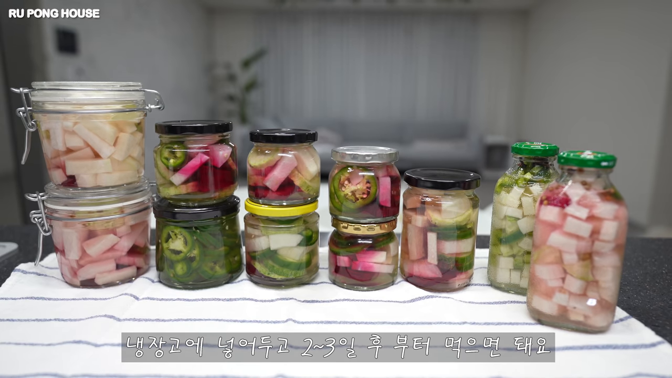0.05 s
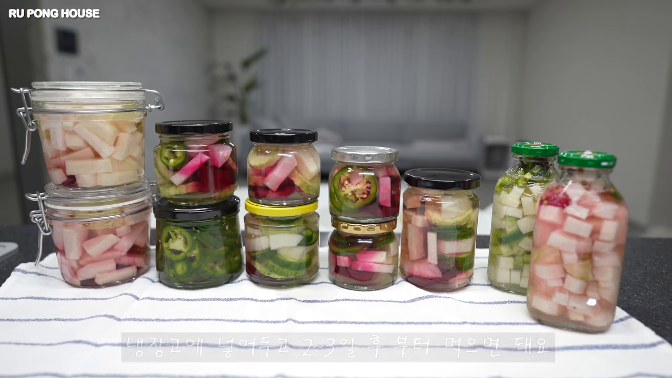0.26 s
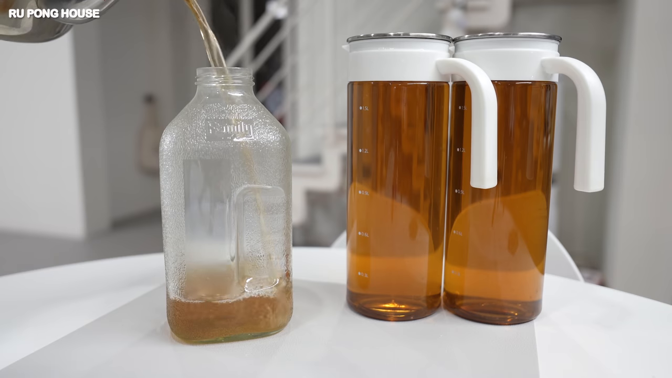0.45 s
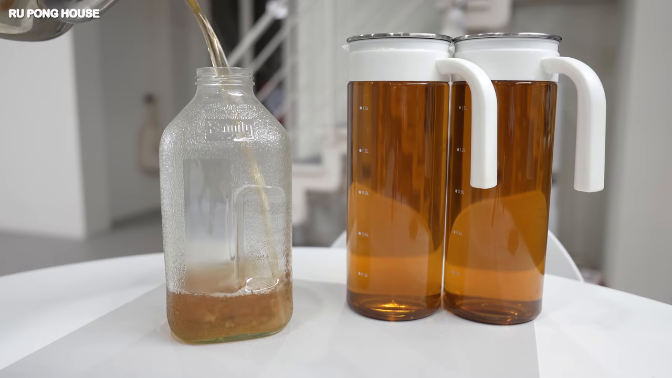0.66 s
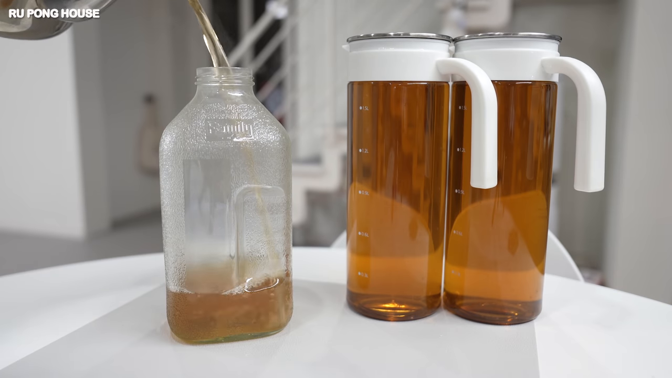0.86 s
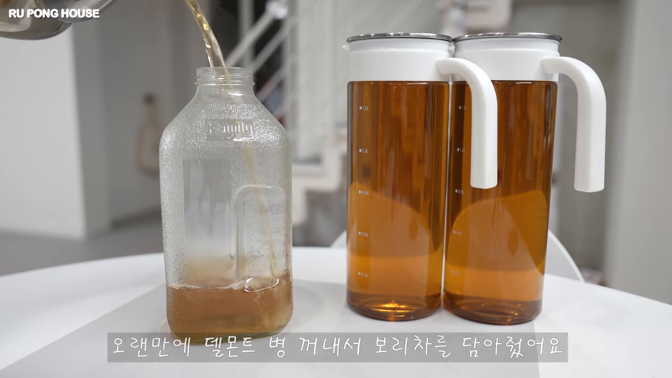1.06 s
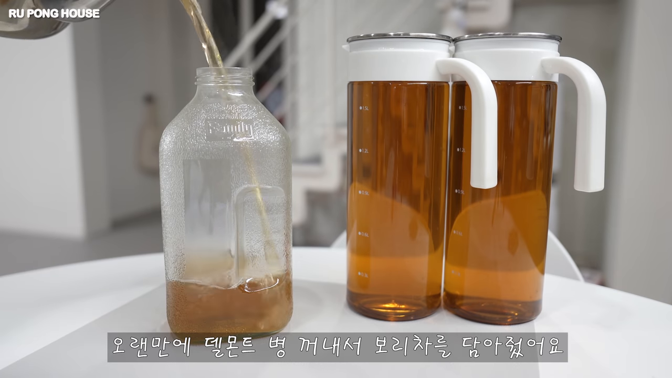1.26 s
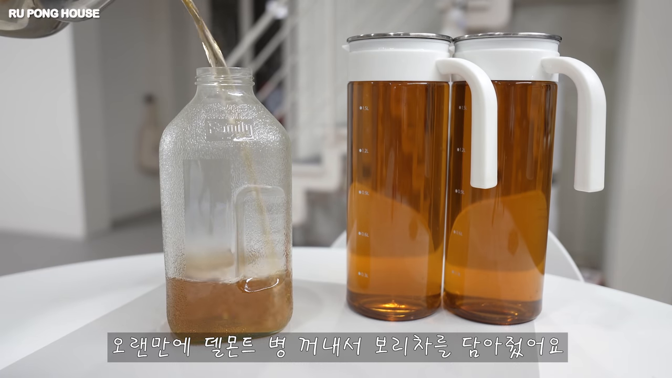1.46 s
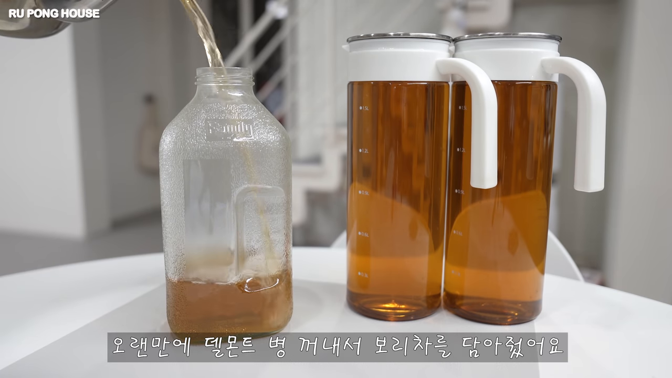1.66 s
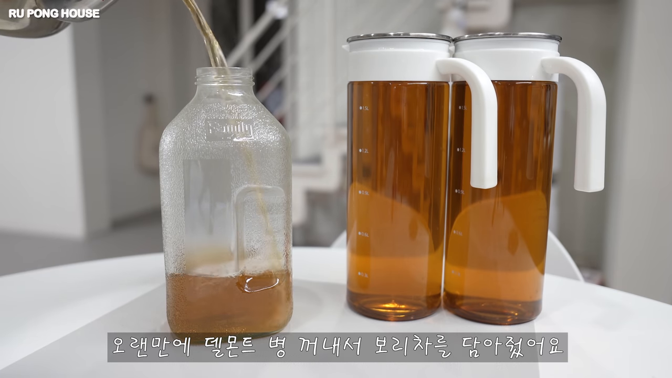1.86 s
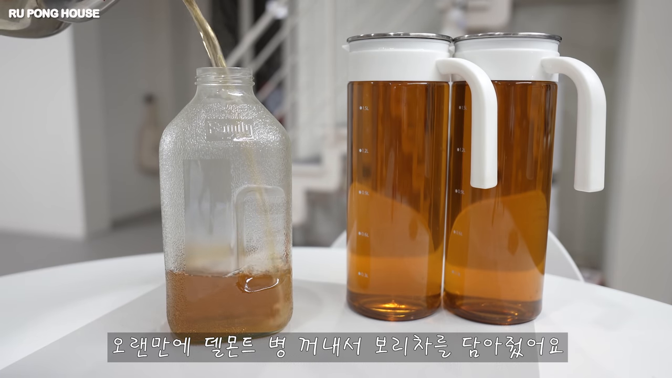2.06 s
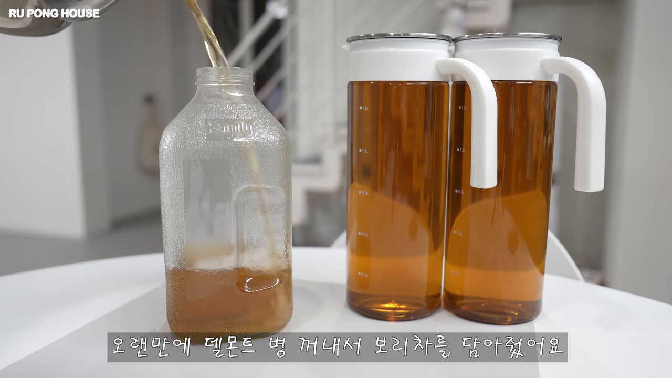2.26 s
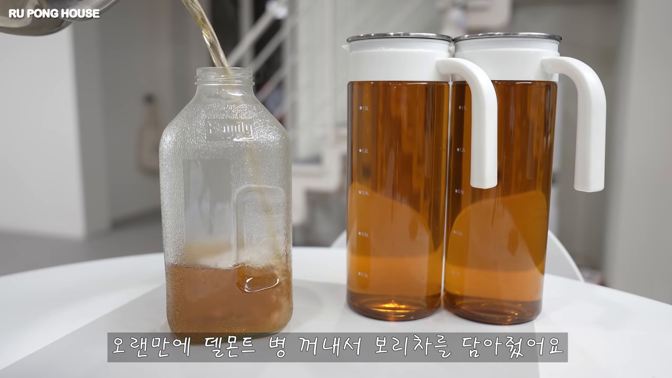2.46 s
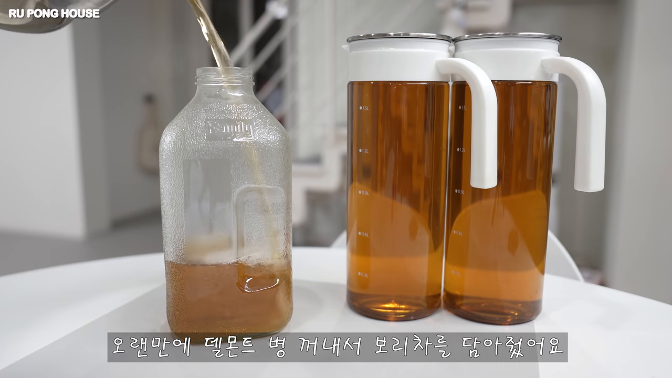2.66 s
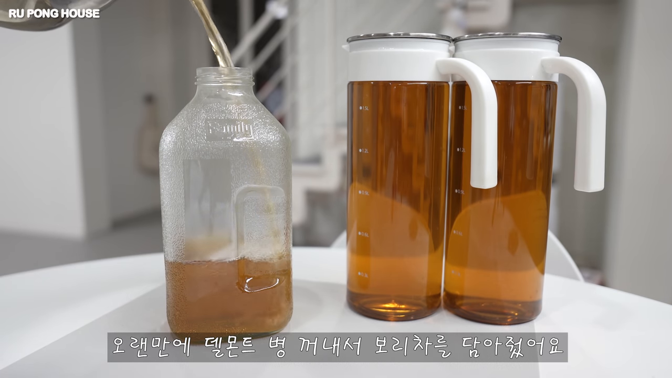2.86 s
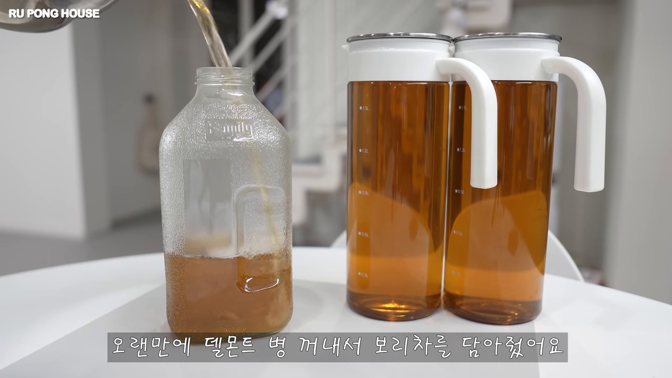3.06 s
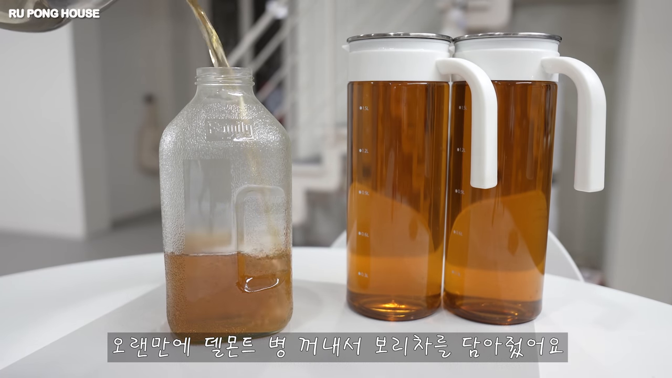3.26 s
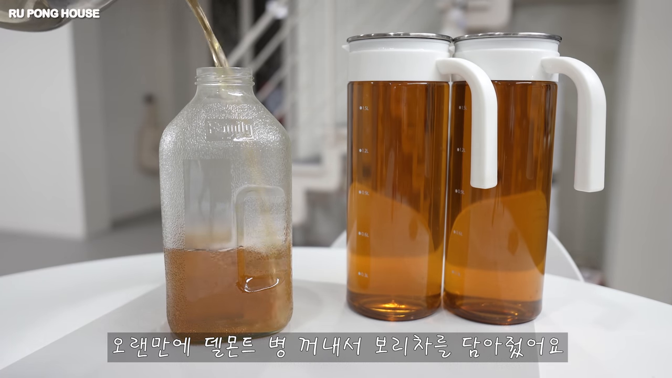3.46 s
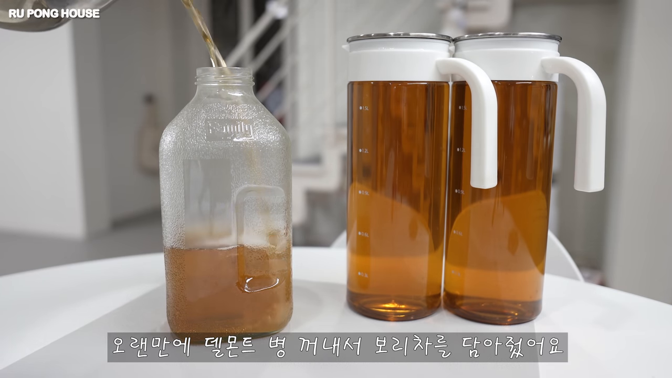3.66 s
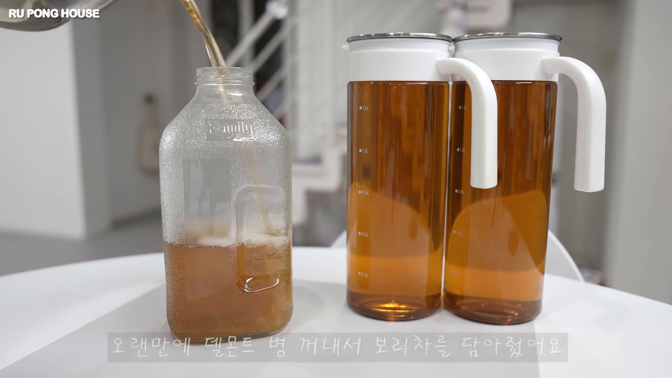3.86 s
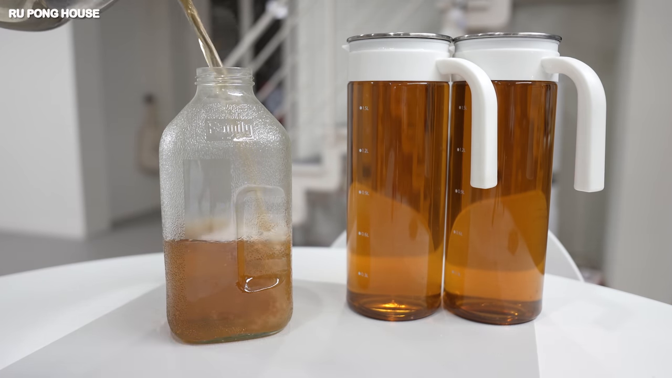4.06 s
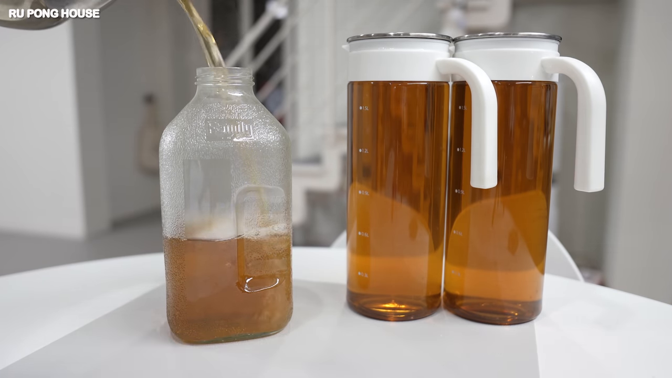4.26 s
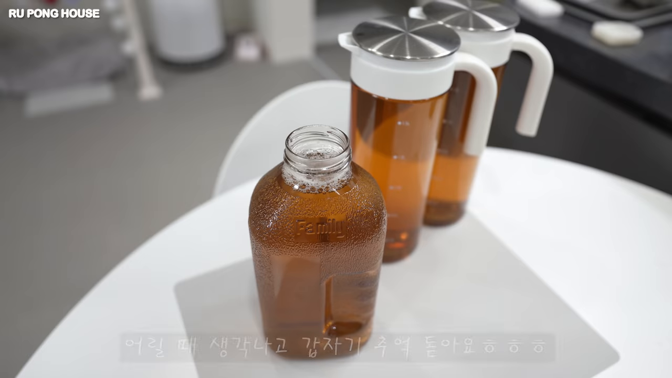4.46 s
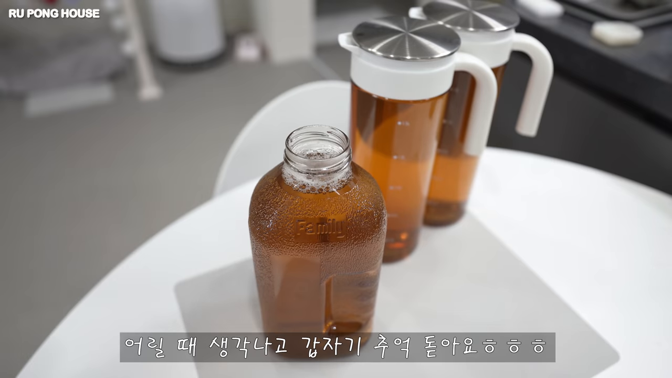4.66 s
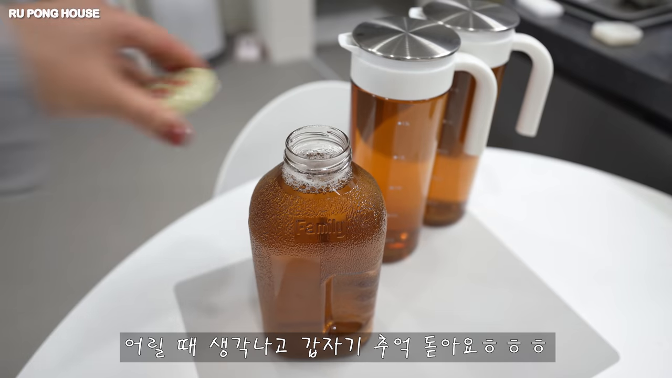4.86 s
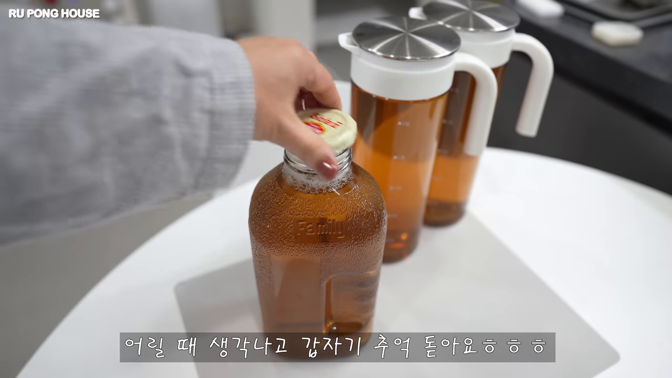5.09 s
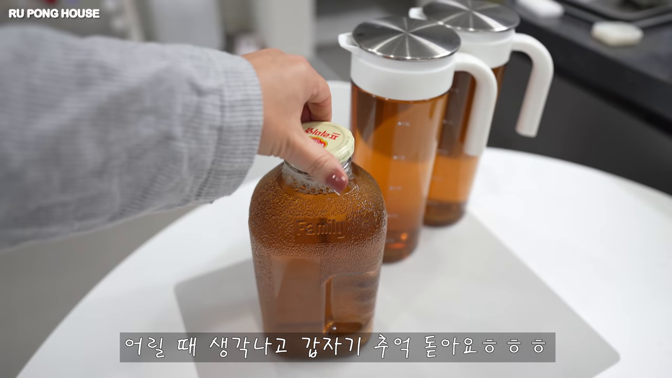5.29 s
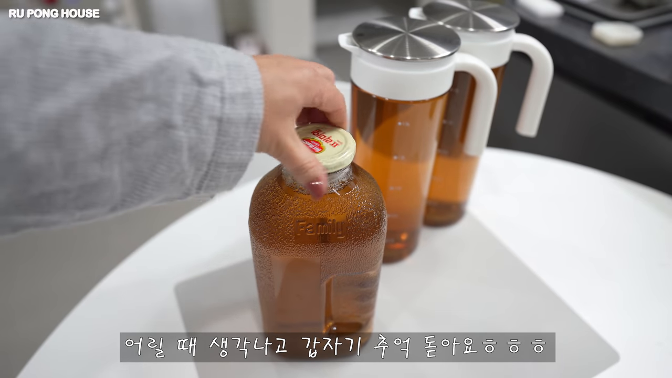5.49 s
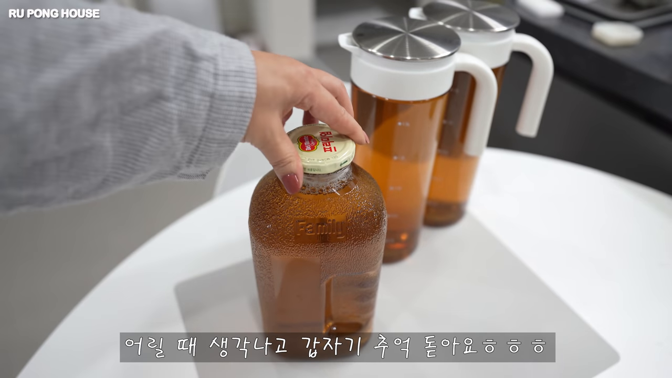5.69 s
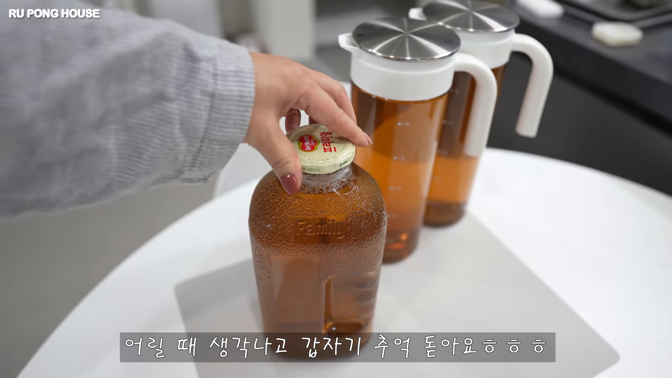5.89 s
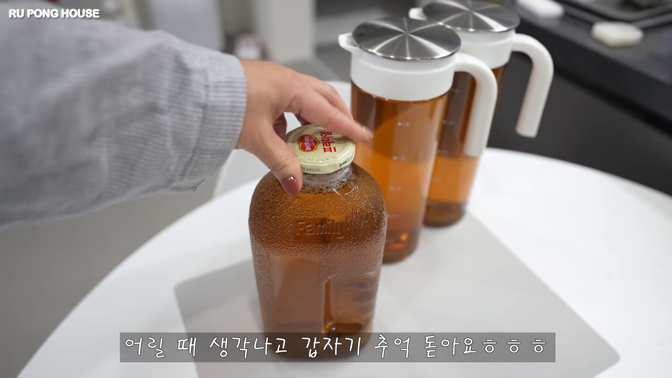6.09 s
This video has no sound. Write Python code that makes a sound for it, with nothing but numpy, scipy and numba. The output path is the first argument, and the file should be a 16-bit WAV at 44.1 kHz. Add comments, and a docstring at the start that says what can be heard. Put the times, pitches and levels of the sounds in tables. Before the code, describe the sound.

In a quiet kitchen with a faint low rumble, a stream of tea suddenly starts pouring into a glass bottle. Bright splashes and fizzing bubbles mix with hollow gurgles whose ringing notes climb as the bottle fills. The pouring thins and ends, then a metal cap knocks sharply on the glass rim, rattles briefly and settles. Close microphone, short room echoes.

```python
"""Behind everything lie a quiet, steady kitchen noise and a slowly changing rumble. Soon hot tea is poured into a glass
bottle on a table: splashes, bubbles and plunging air pockets ring the shrinking air space, whose notes mostly rise.
Then a metal cap clatters onto the rim, with a few faint touches at the end. Random drops and timed hits
set off ringing notes and noise bursts; short echoes stand for the kitchen's walls."""
import sys
import numpy as np
from scipy import signal
from scipy.fft import rfft, irfft, next_fast_len
from scipy.io import wavfile
from numba import njit

SR = 44100
rng = np.random.default_rng(int(sys.argv[2]) if len(sys.argv) > 2 else 0)


def generate_wav(signal):
    """Clip the signal to [-1, 1] and save it as 16-bit WAV at the path in sys.argv[1]."""
    frames = np.transpose(np.atleast_2d(signal))
    scaled = np.clip(frames, -1, 1) * 32767
    pcm = np.round(scaled).astype(np.int16)
    wavfile.write(sys.argv[1], SR, pcm)


N = 270465   # length in samples

# Sharp splashes. Each row: start in seconds, then relative levels and a pitch: bright part in dB,
# part inside the bottle in dB, droplet pitch in Hz, droplet level in dB.
SPLASHES = [(0.3938, -28, -51, 6500, -34.5), (0.4493, -31, -53, 3080, -50), (0.5907, -29, -50, 6300, -51),
            (0.635, -33, -54, 2790, -41), (0.6585, -19, -40.5, 10360, -32),
            (0.757, -24.5, -51, 2960, -37.5), (0.8122, -32, -43, 6840, -38),
            (0.9004, -28, -44, 6640, -35.5), (0.955, -39, -48, 2660, -53), (0.971, -15, -40.5, 7250, -26.5),
            (1.0524, -37, -37.5, 2610, -50), (1.17, -46, -57, 5100, -40), (1.1835, -23, -42.5, 6940, -29),
            (1.2629, -24, -42, 6700, -42), (1.2873, -33, -39.5, 4060, -34), (1.3194, -31, -49, 4580, -38),
            (1.4606, -31, -48, 2540, -44), (1.4798, -26.5, -53, 2570, -43), (1.5742, -33, -50, 2400, -43),
            (1.593, -32, -52, 2720, -54), (1.642, -24.5, -47.5, 2540, -40), (1.6776, -31, -53, 2560, -55),
            (1.705, -31, -48, 2610, -40), (1.7687, -33, -60, 9500, -37), (1.7954, -28.5, -49, 2500, -42),
            (1.8619, -19.5, -44, 9200, -33), (1.9065, -32, -44.5, 6700, -39),
            (1.9537, -25.5, -38, 2780, -49), (1.9738, -34, -46, 2590, -50), (2.079, -26, -44.5, 5270, -36),
            (2.1367, -34.5, -52, 2600, -42), (2.189, -26.5, -40, 2600, -43),
            (2.2208, -28, -47.5, 6080, -34.5), (2.338, -31, -49, 2630, -53), (2.3558, -32, -47, 2630, -45),
            (2.3872, -29.5, -56, 2480, -49), (2.4127, -22, -38, 2650, -42), (2.5039, -34, -42, 2540, -38),
            (2.5674, -30, -45.5, 2500, -48), (2.6637, -35.5, -41, 4520, -42), (2.809, -40, -52, 2590, -53),
            (3.0177, -37, -47, 2580, -45), (3.054, -33.5, -56, 2675, -43), (3.188, -46, -54, 8000, -39),
            (3.1996, -40, -45, 3800, -44), (3.2532, -43, -45.5, 2740, -42), (3.2803, -30.5, -54, 4940, -47),
            (3.3326, -32, -52, 2720, -48), (3.392, -30, -42, 4250, -54), (3.4223, -35, -56, 5500, -44),
            (3.5641, -21.5, -35.5, 2644, -34), (3.631, -30.5, -47, 4400, -46),
            (3.6664, -25, -41, 4240, -53), (3.767, -35, -52, 4000, -45.5), (3.7929, -30, -44, 2830, -48),
            (4.0191, -33, -45.5, 4100, -54), (4.506, -45, -49, 2850, -52), (4.522, -36, -56, 6480, -43),
            (4.5526, -34.5, -49.5, 8030, -47), (4.6138, -32.5, -47, 4050, -42),
            (4.7744, -44, -70, 8380, -56), (4.9017, -41, -66, 13600, -34)]


def amp(db):
    """Decibels to gain."""
    return 10 ** (np.asarray(db) / 20)


def rms_one(x):
    """Scale a sound to an average (rms) strength of 1."""
    return x / np.sqrt(np.mean(x ** 2) + 1e-20)


def in_time(rows):
    """Turn table columns into smooth curves, one value a sample; the first column is time in seconds."""
    s, *columns = np.transpose(rows)
    return [np.interp(np.arange(N) / SR, s, c) for c in columns]


def clicks(times, levels_db):
    """One impulse for each event."""
    out = np.full(N, 1e-18)   # a tiny floor instead of exact zeros
    np.add.at(out, np.round(np.asarray(times) * SR).astype(int), amp(levels_db))
    return out


def grains(per_s, spread_db):
    """Random impulses of very uneven size and either sign; rms 1."""
    excess_db = spread_db * np.minimum(rng.exponential(1, N), 5)
    sizes = amp(excess_db) * rng.choice([-1, 1], N)
    happens = rng.random(N) < per_s / SR
    return rms_one(sizes * happens) + 1e-18


def soft(x, hz):
    """A yielding contact: a second-order low-pass smears the impulses."""
    return signal.sosfilt(signal.butter(2, hz, fs=SR, output="sos"), x)


def band(x, low_hz, high_hz):
    """Keep only the sound between two pitches."""
    return signal.sosfilt(signal.butter(2, [low_hz, high_hz], "band", fs=SR, output="sos"), x)


def dying_noise(times, levels_db, t60):
    """Bursts of noise that fade by 60 dB in t60 seconds."""
    fade = signal.lfilter([1], [1, -amp(-60 / (t60 * SR))], clicks(times, levels_db))
    return fade * rng.standard_normal(N)


@njit
def glide(x, w, r):
    """A unit click sets a sine of height 1 ringing at the moving pitch w; r is the share kept each sample."""
    out, state = np.zeros(len(x)), 0j
    for i in range(len(x)):
        state = state * r[i] * np.exp(1j * w[i]) + x[i]
        out[i] = state.imag
    return out


def ring(x, hz, t60):
    """A note of fixed or moving pitch, set ringing by x."""
    step = 2 * np.pi * hz / SR * np.ones(N)
    kept = amp(-60 / (t60 * SR)) * np.ones(N)
    return glide(x, step, kept)


def resonances(x, table):
    """Side-by-side resonances of (Hz, width in Hz, dB); x is one drive for all or one for each."""
    out = 0
    drives = np.broadcast_to(x, (len(table), N))
    for k, ((hz, width_hz, db), drive) in enumerate(zip(table, drives)):
        r = np.exp(-np.pi * width_hz / SR)
        poles = [1, -2 * r * np.cos(2 * np.pi * hz / SR), r * r]
        top = signal.lfilter([1, 0, -1], poles, drive) * (1 - r * r) / 2
        out = out + (-1) ** k * amp(db) * top   # alternate signs
    return out


def bursts(times, levels_db, hz, t60, bend):
    """Separate dying notes; over its life each changes pitch by twice bend, as a share of its pitch."""
    out = np.zeros(N + SR)
    for s, db, f, life in np.broadcast(times, levels_db, hz, t60):
        i, t = round(s * SR), np.arange(round(life * SR)) / SR
        swell = np.minimum(t * f / 1.51, 1)   # the swing builds up over about one and a half cycles
        swing = np.sin(2 * np.pi * f * t * (1 + bend * t / life))
        out[i:i + len(t)] += swell * amp(db - 60 * t / life) * swing
    return out[:N]


def hush():
    """Background: steady noise shaped by a colour curve, and a slowly changing low rumble."""
    # Colour of the steady noise. Each row: pitch in Hz, relative level in dB.
    colour = [(12, -58.5), (20, -29.5), (65, -10.5), (86, -14.5), (244, -20.5), (281, -31), (323, -22.5),
              (1020, -35), (3720, -53.5), (6910, -46), (8410, -53), (14300, -45.5), (16500, -59.5)]
    # Low rumble through the table. Each row: time in seconds, level in dB.
    rumble = [(0.0, -71), (0.05, -59.5), (0.8, -59), (0.99, -50.5), (3.26, -56), (3.46, -68), (3.52, -46),
              (3.89, -56), (4.03, -54), (4.46, -71), (4.63, -58), (5.12, -64), (5.72, -48.5), (6.13, -59.5)]
    hz = np.maximum(np.arange(N // 2 + 1) * SR / N, 1)
    at, db = np.transpose(colour)
    shape = amp(np.interp(np.log(hz), np.log(at), db))
    steady = rms_one(irfft(rfft(rng.standard_normal(N)) * shape, N))
    low = rms_one(band(rng.standard_normal(N), 45, 80))
    return amp(-63.5) * steady + amp(in_time(rumble)[0]) * low


def drops(count, shared, own, hiss):
    """Drives for several resonances: drops heard in all, drops of its own for each, and hiss."""
    common, private = grains(per_s=140, spread_db=8.0), grains(per_s=110, spread_db=4.5)
    shifts = rng.integers(N, size=count)
    landing = shared * common + own * np.array([np.roll(private, s) for s in shifts])
    # a drop spatters briefly
    smear = rms_one(signal.lfilter([1], [1, -amp(-60 / (0.021 * SR))], np.abs(landing)))
    return (smear + hiss) * rng.standard_normal(N)


def bubbles(count, low_hz, high_hz, cycles):
    """Small bubbles born at random, pitch rising as they near the surface; rms 1."""
    when, size, strength = rng.random((count, 3)).T
    hz = low_hz * (high_hz / low_hz) ** size
    level_db = -5.0 * np.log(strength + 1 / 100)
    return rms_one(bursts(.39 + 4.6 * when, level_db, hz, cycles / hz, bend=0.326))


def inside_bottle(slosh_db, wall_hz, overtones_hz, heave):
    """Sloshing tea excites fixed resonances, the glass wall and the air's overtones; small bubbles fizz."""
    # Steady resonances in the bottle. Each row: pitch in Hz, width in Hz, relative level in dB.
    bottle_modes = [(533, 36, -2), (2697, 140, 5), (3030, 160, -0.5), (4054, 336, 0), (5170, 580, -3.5)]
    # Overtones of the air column. Each row: relative level in dB, ring time (60 dB fade) in seconds.
    overtones = [(-26, 0.018), (-37.5, 0.025), (-35.5, .015)]
    s, _, inside_db, _, _ = np.transpose(SPLASHES)
    slosh = amp(slosh_db) * drops(len(bottle_modes), shared=0.86, own=0.84, hiss=0.54)
    slosh = slosh + dying_noise(s, inside_db + 7.0, t60=0.044)
    out = amp(5.0) * resonances(slosh, bottle_modes)
    out = out + amp(-35.5) * ring(slosh[0], wall_hz, t60=0.059)
    for (db, t60), hz, drive in zip(overtones, overtones_hz, slosh[1:]):
        out = out + amp(db) * ring(drive, heave * hz, t60)
    return out + amp(slosh_db - 18) * bubbles(count=1200, low_hz=381, high_hz=1690, cycles=38.0)


def spray_at_mouth(spray_db):
    """Spray and sharp splashes are noise coloured by high resonances; tiny bubbles fizz along."""
    # Colour of the spray. Each row: pitch in Hz, width in Hz, relative level in dB.
    mouth = [(6560, 416, -3), (8050, 320, -3), (9210, 730, -6.5), (11500, 1100, -4), (12000, 1300, -4.5),
             (15200, 2300, -10)]
    s, bright_db, _, _, _ = np.transpose(SPLASHES)
    spray = amp(spray_db + 1.5) * drops(len(mouth), shared=0.92, own=0.69, hiss=0.41)
    spray = spray + dying_noise(s, bright_db - 2.5, t60=0.027)
    fizz = amp(spray_db - 3.8) * bubbles(count=2200, low_hz=3760, high_hz=14500, cycles=65.0)
    return amp(3.5) * resonances(spray, mouth) + fizz


def droplets():
    """Each sharp splash adds a short note that rises in pitch; high ones die sooner."""
    s, _, _, hz, db = np.transpose(SPLASHES)
    return bursts(s, db, hz, 175.0 / hz, bend=0.075)


def gurgles():
    """Large bubbles give low notes that rise as they die."""
    # Each row: start in seconds, level in dB, starting pitch in Hz.
    large_bubbles = [(0.395, -47.5, 622), (0.594, -44, 465), (0.659, -44, 616), (0.7, -42, 603),
                     (0.861, -48, 431), (0.901, -36, 537), (0.972, -42, 474), (1.079, -50, 666),
                     (1.461, -39, 610), (1.504, -39, 490), (1.543, -36.5, 465), (1.583, -36.5, 464),
                     (1.956, -35.5, 530), (2.153, -57, 431), (2.189, -35.5, 470), (2.285, -36, 580),
                     (2.504, -47, 485), (2.563, -39, 470), (2.67, -38.5, 530), (3.015, -43, 547),
                     (3.114, -37, 454), (3.16, -37, 544), (3.276, -43, 483), (3.405, -50, 436),
                     (3.801, -39, 558), (4.018, -54, 434)]
    s, db, hz = np.transpose(large_bubbles)
    return bursts(s, db, hz, 28 / hz, bend=0.316)


def air_column(hz, level_db):
    """The air above the tea rings under a patter of drops and under single knocks."""
    # Knocks on the air column. Each row: start in seconds, relative level in dB.
    knock_rows = [(0.3951, -45), (0.4704, -38.5), (0.6119, -47), (0.6599, -31), (0.831, -59), (0.8625, -50),
                  (0.9865, -35.5), (1.0578, -36), (1.0866, -43), (1.2983, -34), (1.62, -40), (1.6819, -46),
                  (1.8164, -34), (1.842, -35.5), (1.949, -43.5), (2.0114, -42), (2.0456, -60),
                  (2.1352, -38), (2.1962, -33.5), (2.284, -42), (2.315, -50), (2.3894, -37),
                  (2.4128, -35.5), (2.482, -38.5), (2.5637, -34), (2.9303, -52.5), (3.0204, -35.5),
                  (3.1131, -40), (3.2215, -43), (3.2907, -31.5), (3.3187, -34), (3.3877, -38), (3.491, -40),
                  (3.6912, -35), (3.7982, -33), (3.9335, -42.5), (4.4421, -48), (4.6977, -42.5)]
    # Foam damps the air more as the bottle fills. Each row: time in seconds, ring time in seconds
    # (60 dB fade, under the patter).
    damping = [(.4, 0.088), (3.0, 0.059), (4.9, 0.034)]
    t60, = in_time(damping)
    patter = grains(per_s=1500, spread_db=6.5)
    # the stream keeps closing and opening the neck, so the note breaks up
    flutter_db = 4 * rms_one(soft(rng.standard_normal(N), hz=6.4))
    steady = amp(level_db + flutter_db - 0.5) * rms_one(ring(patter, hz, t60))
    knocks = soft(clicks(*np.transpose(knock_rows)), hz=2030)
    # each knock brings a short flurry of noise
    flurry = soft(dying_noise(*np.transpose(knock_rows), t60=0.054), hz=2160)
    return steady + ring(knocks + amp(-24.0) * flurry, hz, t60=1.27 * t60)


def neck_and_table(neck_hz, neck_db, table_db):
    """Churning tea and surges ring the neck's low note and the table; air pockets pop."""
    # Surges. Each row: start in seconds, then relative levels in dB of neck note, table thump, air pocket.
    plunges = [(0.757, -39.5, -38.5, -65), (0.865, -30, -46, -39), (1.055, -33, -40, -43),
               (1.14, -35.5, -45, -41), (1.254, -29, -35.5, -40.5), (1.46, -40, -37.5, -46),
               (1.506, -29, -48, -43), (1.585, -31, -38, -37.5), (1.798, -30.5, -36, -40),
               (1.91, -23.5, -44, -38), (1.957, -21.5, -38, -35), (2.085, -28, -56, -52),
               (2.157, -24, -38, -35), (2.222, -25.5, -33.5, -36.5), (2.344, -17.5, -59, -58),
               (2.417, -20.5, -56, -41), (2.475, -22.5, -53, -40), (2.583, -32, -31, -39),
               (2.665, -23, -35, -34), (2.727, -28.5, -36, -58), (2.813, -28, -51, -67),
               (2.863, -25.5, -45, -58), (2.999, -30, -45, -54), (3.118, -18, -31.5, -42),
               (3.231, -29.5, -42, -47), (3.292, -12.5, -49.5, -42), (3.335, -20, -35, -52),
               (3.394, -19.5, -51, -50), (3.432, -31, -57, -50), (3.512, -21, -48, -48),
               (3.552, -32, -32.5, -51), (3.638, -23, -37, -43), (3.7, -27, -56, -51),
               (3.754, -31.5, -47, -59), (3.866, -22, -34, -47), (3.933, -27, -44, -61),
               (4.024, -21.5, -31.5, -50), (4.445, -36.5, -62, -50), (4.614, -27.5, -46, -53),
               (4.688, -32.5, -43, -57)]
    # Each row: time in seconds, ring time (60 dB fade) in seconds of the neck note after a surge.
    neck_damping = [(.4, 0.47), (2.0, 0.23), (3.3, 0.12), (4.9, 0.093)]
    # Table top under the bottle. Each row: pitch in Hz, width in Hz, relative level in dB.
    table_modes = [(106.6, 9.1, 1.5), (137, 9.6, 1), (203, 44, -18), (300.7, 48, -11)]
    when, surge_db, thump_db, pocket_db = np.transpose(plunges)
    churn = grains(per_s=120, spread_db=2.5)
    neck = amp(neck_db + 1.0) * rms_one(ring(soft(churn, hz=350), neck_hz, t60=0.15))
    neck = neck + ring(soft(clicks(when, surge_db), hz=403), neck_hz, *in_time(neck_damping))
    neck = band(neck, 170, 420)
    # the air pocket itself pops at 350.8 Hz, rising
    gulp = bursts(when, pocket_db + 8.5, 350.8, 0.059, bend=0.18)
    rattle = churn + 0.62 * grains(per_s=200, spread_db=3.5)
    thrum = amp(table_db - 1.0) * rms_one(resonances(rattle, table_modes))
    thumps = amp(56.5) * resonances(soft(clicks(when, thump_db), hz=250), table_modes)
    return neck + gulp + thrum + thumps


def pouring():
    """The stream drives every part of the bottle while its air space shrinks."""
    # Notes of the filling bottle. Each row: time in seconds, then pitches in Hz of the neck, the glass wall,
    # the air column and its three overtones.
    filling = [(.39, 237.2, 1710, 1193, 2200, 3100, 4300), (1.5, 256.2, 1728, 1282, 2415, 3280, 3820),
               (2.5, 261.8, 1630, 1421, 2550, 3700, 4240), (3.3, 282.3, 1540, 1520, 2730, 3720, 5130),
               (4.0, 273.4, 1416, 1680, 2850, 3790, 4800), (4.95, 306.7, 1355, 1922, 3190, 4000, 4800)]
    # The stream. Each row: time in seconds, then relative levels in dB of table thrum, neck note,
    # air column, slosh inside, spray at the mouth.
    stream = [(0.44, -46.5, -73, -66, -52, -54), (0.59, -48, -54, -50, -53.5, -54),
              (0.82, -47.5, -56, -46, -52.5, -51.5), (0.88, -34, -57, -49, -56.5, -60),
              (0.98, -43.5, -53, -61, -53.5, -49.5), (1.12, -44, -48, -47.5, -56.5, -53),
              (1.34, -38.5, -56, -63.5, -52.5, -48.5), (1.43, -64, -46, -49, -54, -54),
              (1.48, -35.5, -50, -46, -54.5, -51.5), (1.83, -44.5, -60, -57.5, -49, -55.5),
              (1.88, -34.5, -46, -56, -56, -51), (2.04, -39, -35, -56.5, -55.5, -54.5),
              (2.49, -37, -42.5, -48.5, -52, -56.5), (2.88, -40.5, -43, -59, -52.5, -58),
              (2.97, -59, -46.5, -65.5, -58.5, -62.5), (3.12, -42, -35, -53, -59, -56),
              (3.28, -39, -37.5, -57, -54, -58), (3.61, -43.5, -33.5, -55, -50, -59),
              (3.78, -42.5, -36.5, -55, -51, -57), (4.06, -38, -44.5, -55, -53.5, -65.5),
              (4.39, -54, -56.5, -60, -54.5, -72.5), (4.65, -40.5, -43, -61.5, -57.5, -59.5),
              (4.95, -58, -63, -78, -75, -90), (5.05, -81, -82, -93, -100, -81)]
    neck_hz, wall_hz, column_hz, *overtones_hz = in_time(filling)
    before_db = -120 * (np.arange(N) < .392 * SR)   # the pouring sets in at full flow at 0.392 s
    table_db, neck_db, column_db, slosh_db, spray_db = in_time(stream) + before_db
    # the surface heaves, so the air notes wobble
    heave = 1 + 0.013 * rms_one(soft(rng.standard_normal(N), hz=16.4))
    out = inside_bottle(slosh_db, wall_hz, overtones_hz, heave)
    out = out + spray_at_mouth(spray_db) + droplets() + gurgles()
    out = out + air_column(heave * column_hz, column_db)
    return out + neck_and_table(neck_hz, neck_db, table_db)


def kitchen(x):
    """Eighteen feedback delays whose echoes grow duller, summed in the frequency domain."""
    size = next_fast_len(N + SR)
    hz = np.arange(size // 2 + 1) * SR / size
    t60 = 0.32 / np.sqrt(1 + (hz / 10300) ** 2)   # seconds; high notes fade sooner
    echoes = 0
    for k, lag in enumerate(np.geomspace(.0071, .047, 18)):   # delay in seconds
        once = amp(-60 * lag / t60) * np.exp(-2j * np.pi * hz * lag)
        echoes = echoes + (-1) ** k * once / (1 - once)
    return irfft(rfft(x, size) * echoes, size)[:N]


def cap():
    """Every touch thuds the held cap, squeezes the air under it, ticks and leaves metal and glass ringing."""
    # Cap on rim. Each row: start in seconds, thud level in dB, thud pitch in Hz, then relative levels in dB
    # of trapped air, tick and ringing.
    clatter = [(5.2405, -9.5, 1480, -63, -46, -32), (5.2419, -20, 1544, -25, -51, -22.5),
               (5.2474, -10.5, 1510, -45, -38.5, -60), (5.2504, -19, 1590, -47, -61, -48),
               (5.2614, -37.5, 1600, -44.5, -61.5, -51), (5.293, -38, 1340, -54, -72, -54.5),
               (5.3487, -13.5, 1496, -58, -28.5, -31.5), (5.3624, -40, 1230, -49, -29, -50),
               (5.3694, -55, 1190, -20, -36, -23), (5.3896, -17.5, 1410, -31, -34.5, -30),
               (5.4585, -21, 1440, -15.5, -40, -36), (5.4804, -24.5, 1710, -22, -34.5, -33.5),
               (5.4839, -21, 1270, -37, -60, -30.5), (5.4904, -26, 1350, -14.5, -41, -54),
               (5.5084, -23.5, 1250, -16, -43.5, -47), (5.5323, -47, 1310, -21.5, -56, -67),
               (5.5444, -44, 1140, -19, -63, -67), (5.5548, -26, 1114, -15, -55, -66),
               (5.5604, -37, 1140, -12.5, -56, -55), (5.5664, -29.5, 1310, -20.5, -55, -55),
               (5.5734, -33.5, 1130, -9.5, -30.5, -40), (5.5804, -35, 1585, -14.5, -47, -46),
               (5.5892, -28.5, 1525, -18.5, -59, -71), (5.6366, -39, 1390, -41, -69, -68),
               (5.6494, -40, 1430, -67, -76, -48), (5.8466, -56, 1450, -60, -59.5, -65),
               (5.891, -56, 1460, -68.5, -69, -63.5), (5.9728, -57.5, 1510, -65.5, -79, -70)]
    # The trapped air's note sinks as the cap seats. Each row: time in seconds, pitch in Hz.
    air_pitch = [(5.37, 1050), (5.46, 935), (5.57, 799)]
    # Colour of the tick, metal on glass, and of its highest part. Each row: pitch in Hz, width in Hz,
    # relative level in dB.
    tick_colour = [(3500, 290, -2.5), (4390, 180, -0.5), (5170, 490, 0.5), (6470, 1300, 2),
                   (6840, 460, 4.5), (7900, 560, -14)]
    high_colour = [(10600, 1300, -11.5), (12000, 900, -4.5), (14400, 1500, -4.5)]
    # The highest part is brightest while the cap sits loose. Each row: time in seconds, boost in dB.
    high_boost = [(5.25, 2.5), (5.35, 12), (5.46, 4), (5.57, 2.5)]
    # Notes of the held cap. Each row: pitch in Hz, relative level in dB, ring time in seconds.
    thud_modes = [(925, -19, 0.034), (1181, -17.5, 0.064), (1383, -9, 0.032), (1530, -21.5, 0.11),
                  (1750, -36.5, 0.12), (2260, -20, 0.048)]
    # Free ringing of cap and glass: a list of pitches in Hz.
    free_hz = [2627, 2853, 2923, 2993, 3090, 3187, 3440, 3655, 3994, 4264, 4310, 5373]
    # One row for each of those pitches: relative level in dB, ring time in seconds.
    free_ringing = [(-4.5, .35), (-9, 0.25), (-4.5, 0.14), (-4.5, 0.35), (-7.5, 0.19), (-3.5, 0.1),
                    (-15, .15), (-6.5, 0.059), (-11, 0.25), (-9, 0.12), (-9.5, 0.14), (-17.5, .2)]
    s, thud_db, thud_hz, air_db, tick_db, ring_db = np.transpose(clatter)
    air_hz = np.interp(s, *np.transpose(air_pitch))
    out = bursts(s, thud_db, thud_hz, 0.023, bend=-0.01)
    out = out + bursts(s, air_db - 4, air_hz, 0.028, bend=-0.032)
    out = out + resonances(dying_noise(s, tick_db + 11.0, t60=0.016), tick_colour)
    high_db = tick_db + np.interp(s, *np.transpose(high_boost))
    out = out + resonances(dying_noise(s, high_db, t60=0.027), high_colour)
    for modes, db in ((thud_modes, thud_db), (np.c_[free_hz, free_ringing], ring_db - 13.5)):
        for hz, mode_db, t60 in modes:
            uneven_db = 2 * rng.standard_normal(len(s))   # no two touches are alike
            out = out + bursts(s, db + mode_db + uneven_db, hz, t60, bend=0)
    # too small to radiate bass
    return signal.sosfilt(signal.butter(2, 480, "high", fs=SR, output="sos"), out)


def scene():
    """Bottle and cap, their echoes in the kitchen and the background."""
    near = pouring() + cap()
    return (near + amp(-26) * kitchen(near) + hush())[None]


def record(dry):
    """The deepest bass is thinned below 40 Hz, the top is cut from 17 kHz."""
    thin = signal.sosfilt(signal.butter(2, 40, "high", fs=SR, output="sos"), dry)
    return signal.sosfilt(signal.cheby2(12, 60, 17000, fs=SR, output="sos"), thin)


dry = scene()
out = record(dry)
generate_wav(out)
```